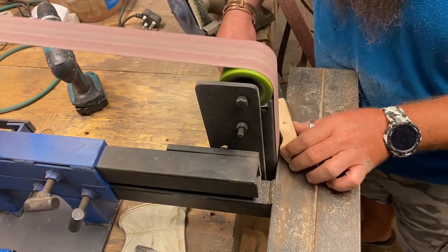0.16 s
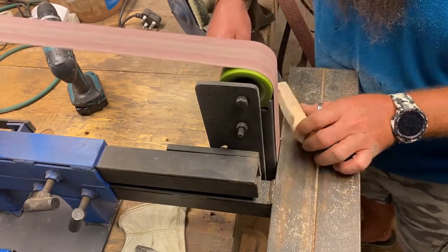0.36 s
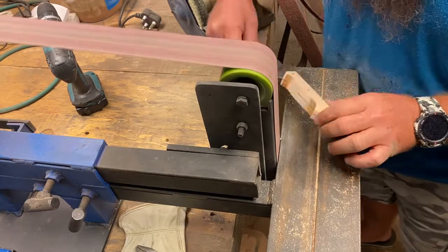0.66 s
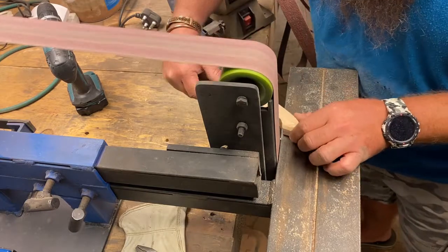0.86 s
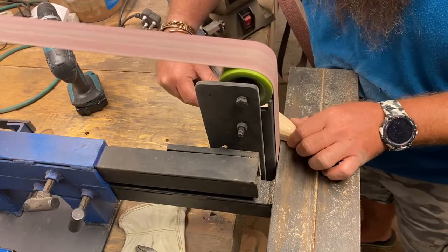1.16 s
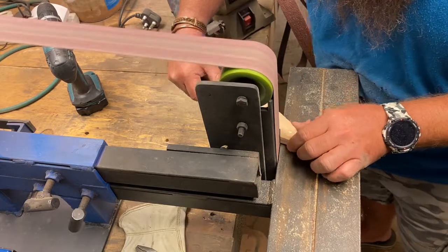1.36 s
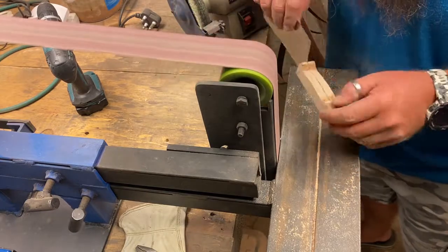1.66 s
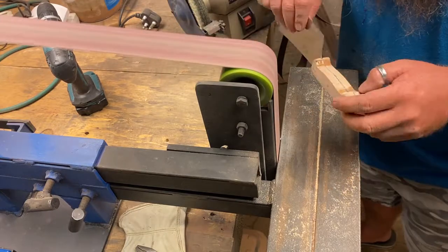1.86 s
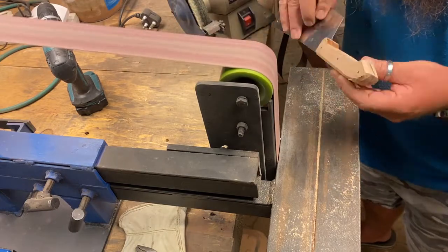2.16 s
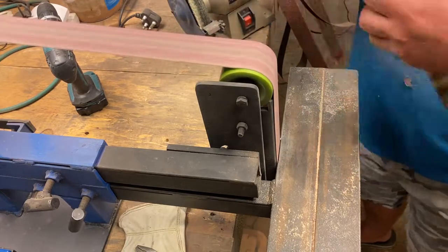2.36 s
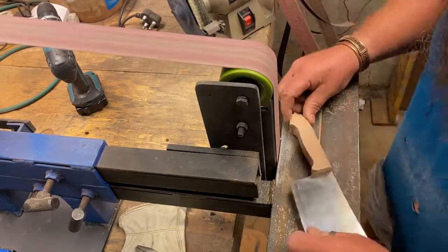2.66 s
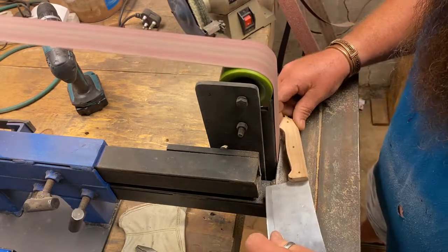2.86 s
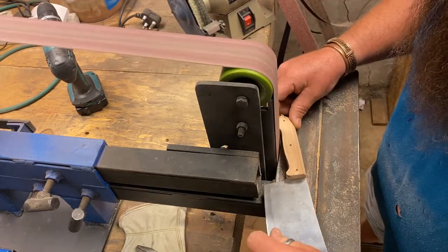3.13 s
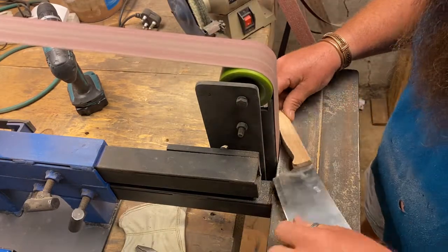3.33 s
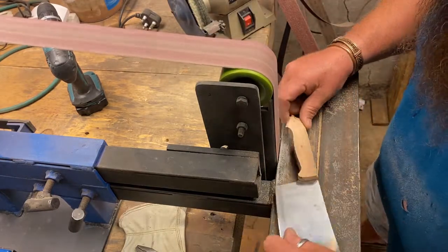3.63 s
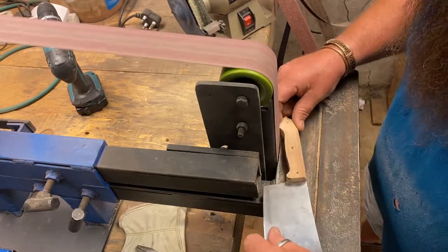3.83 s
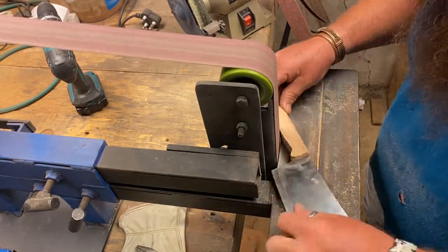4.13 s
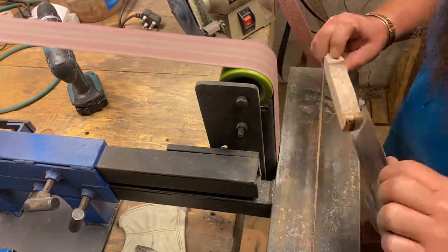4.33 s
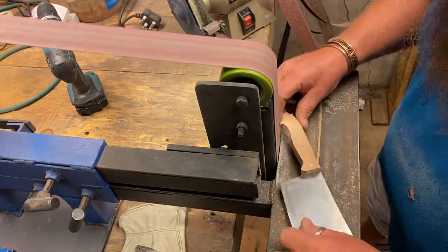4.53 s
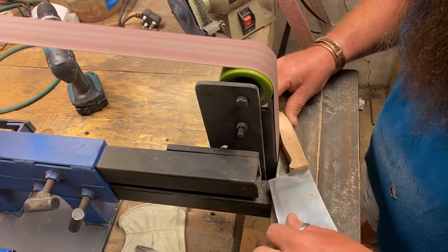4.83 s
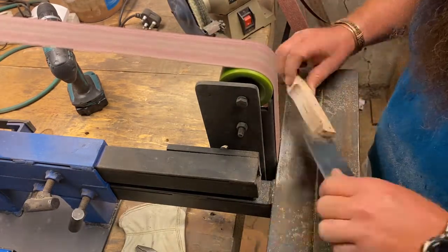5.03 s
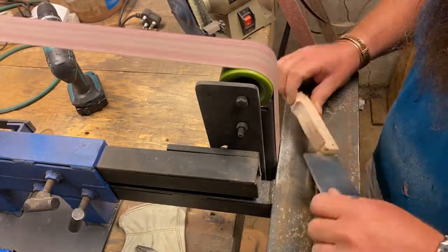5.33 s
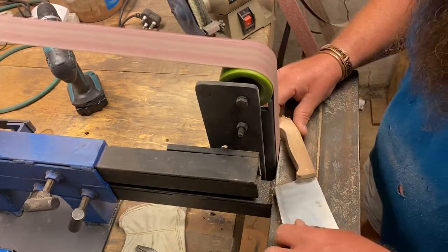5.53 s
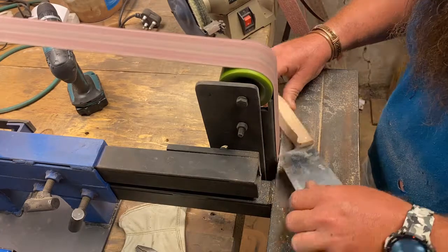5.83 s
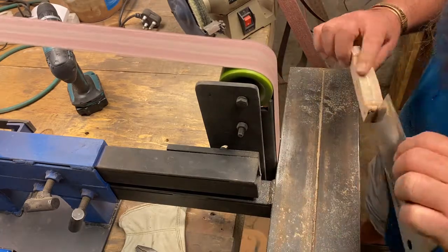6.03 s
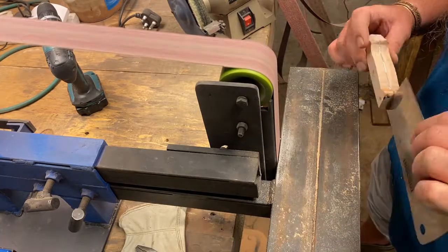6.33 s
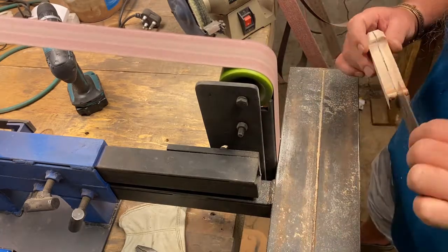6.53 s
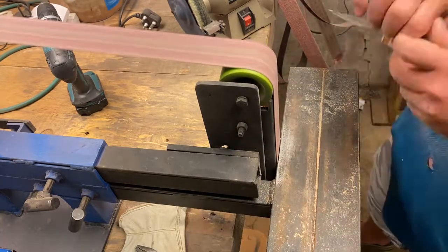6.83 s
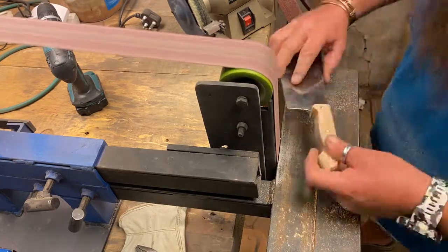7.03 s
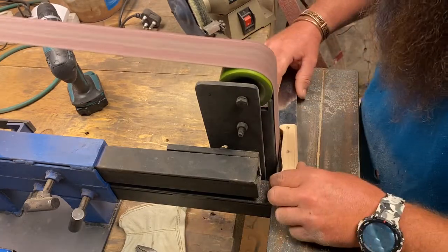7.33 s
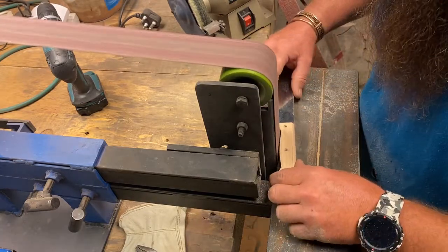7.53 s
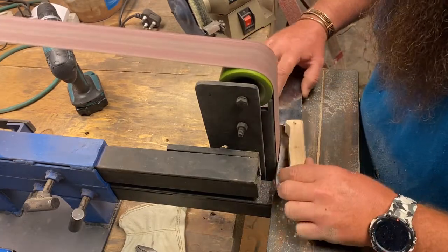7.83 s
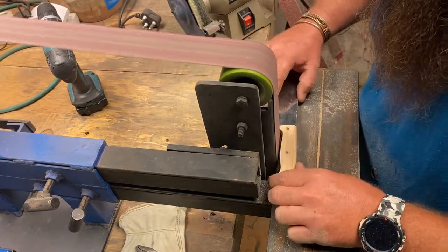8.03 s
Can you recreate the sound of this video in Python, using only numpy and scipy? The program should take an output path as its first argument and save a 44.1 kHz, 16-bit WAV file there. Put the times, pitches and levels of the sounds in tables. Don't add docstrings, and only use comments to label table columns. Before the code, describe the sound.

A running belt grinder fills the close stereo sound with a dense, rough drone, fluttering hum and windy belt noise. Wood is already sanding at the start, then touches lightly, presses harder several times in the middle, pauses, and returns near the end. Each contact is a crisp, high tearing hiss with a tiny pitch drop; the machine never stops.

```python
import sys
import numpy as np
from scipy import signal
from scipy.fft import rfft, irfft, next_fast_len
from scipy.io import wavfile
from scipy.ndimage import uniform_filter1d, map_coordinates

SR = 44100
rng = np.random.default_rng(int(sys.argv[2]) if len(sys.argv) > 2 else 0)


def linear_from_db(decibels):
    return 10 ** (np.asarray(decibels, float) / 20)


def to_wav(s):
    ch = np.atleast_2d(s).T
    pcm = np.round(np.clip(ch, -1, 1) * 32767)
    wavfile.write(sys.argv[1], SR, pcm.astype(np.int16))


N = 360738
DRIVE_HZ, FAN_HZ, GUIDE_HZ, MOTOR_HZ = 197.17, 199.485, 302.01, 299.98
RATTLE_HZ, CONTACT_WHEEL_HZ = 100.2, 32.75


def unit(x):
    return x / np.sqrt(np.mean(x ** 2) + 1e-20)


def along(points, hz):
    f, value = np.transpose(points)
    return np.interp(np.log(hz + 1), np.log(f + 1), value)


def curves(rows):
    s, *columns = np.transpose(rows)
    return [np.interp(np.arange(N) / SR, s, column) for column in columns]


def wobble(rate):
    knots = rng.standard_normal(int(N * rate / SR) + 4)
    smooth = map_coordinates(knots, [np.arange(0, N, 32) * rate / SR])
    return np.repeat(smooth, 32)[:N].astype(np.float32)


def repeating(turn_hz, likeness):
    def response(hz):
        kept = np.clip(likeness(hz), 0, .9)
        return 1 / (1 - kept * np.exp(-2j * np.pi * hz / turn_hz))
    return response


def rush(spectrum, source=None, comb=lambda hz: 1):
    # f/Hz, correlation/1
    ear_likeness = [(100, 0.79), (290, 0.91), (640, 0.83), (1400, 0.78), (3100, 0.15), (5000, 0.18),
                    (7000, 0.1), (10000, 0.66), (15000, 0.63)]
    pair = rng.standard_normal((2, N)) if source is None else source
    m = next_fast_len(N, True)
    hz = np.fft.rfftfreq(m, 1 / SR)
    turn = np.arccos(np.clip(along(ear_likeness, hz), -1, 1)) / 2
    coloured = rfft(pair, m) * linear_from_db(along(spectrum, hz)) * comb(hz)
    mid, side = irfft(coloured * [np.cos(turn), np.sin(turn)], m)[:, :N]
    return unit(np.array([mid + side, mid - side]))


def hum(orders, turns, base_hz, trim_db, lag=0., waver=0.25):
    out = np.zeros((2, N), np.float32)
    for k, db, pan_db, lead in orders:
        height = min(.07 + k * base_hz / 3000, 1.1)
        cycles = k * turns - lag * (k - 1)
        phase = (2 * np.pi * (cycles - np.floor(cycles))).astype(np.float32)
        phase = phase + height * 1.6 * waver * wobble(7)
        peak = np.float32(linear_from_db(db + trim_db) * np.sqrt(2))
        size = peak * np.abs(1 + height * waver * wobble(6))
        for channel, side in enumerate((1 / 2, -1 / 2)):
            out[channel] += size * float(linear_from_db(side * pan_db)) * np.cos(phase + side * lead)
    return out


def drag():
    # slowing from t/s, slowest t/s, free again t/s, peak load/%
    loads = [
        (-.04, .314, .4, .95),
        (1.17, 1.347, 1.449, .46),
        (3.055, 3.349, 3.471, .67),
        (3.858, 4.106, 4.26, 1.13),
        (4.712, 4.964, 5.039, 1.32),
        (5.612, 5.784, 5.928, 1.39),
        (7.433, 7.651, 7.7, .96),
        (8.06, 8.13, 8.2, .3),
    ]
    t = np.arange(N) / SR
    loss = np.zeros(N)
    for start, slowest, free, percent in loads:
        loss += percent * np.sin(np.interp(t, [start, slowest, free], [0, np.pi / 2, 0]))
    return np.pi / 4 * loss


def wheels(clock):
    # multiple/1, level/dB, left-right/dB, left lead/rad
    drive_orders = [(1, -34, 0, 0.0), (2, -26, 1, -0.0), (3, -35, 0, 0.0), (4, -54, 4, 0.2),
                    (5, -51, -1, 1.0), (6, -42, -3, 0.7), (7, -42, -3, 0.5), (8, -49, 4, -0.0),
                    (9, -49, -9, 0.8), (10, -51, 0, 1.5), (11, -53, 1, 0.5), (12, -54, -3, 0.6)]
    fan_orders = [(2, -38, 0, -0.1), (4, -46, -6, -0.3), (6, -44, 3, 0.4), (10, -52, 5, 1.0)]
    guide_orders = [(3, -41, 2, -0.2), (4, -41.5, 4, 0.4), (5, -48, 1, -0.3), (6, -54, -4, -0.7)]
    # f/Hz, level/dB, left-right/dB, left lead/rad
    bearing_tones = [(497, -57, 0, 0), (596, -50, 0, 0), (636, -53, 0, -.3), (709, -58, -1, .3),
                     (995, -55, 0, .3), (1102.8, -46, -5, .8), (1287.5, -50, 0, .5), (1609.8, -50, 2, .2),
                     (1204.7, -50, 0, .4), (1807, -49, -2, 0), (2402, -49.5, 1, .3), (2655, -50, 3, .1),
                     (2955, -57, 2, .5), (3154, -56, 0, .5), (4800, -56, -2, .5), (2793, -53, 7, 1.7),
                     (3352, -54, 9, .6), (4397, -54, -1, 1.2)]
    drive = DRIVE_HZ * clock + .25
    fan = FAN_HZ * np.arange(N) / SR + .175
    thumps = hum(drive_orders, drive, DRIVE_HZ, 0., lag=1 / 4)
    thumps += hum(fan_orders, fan, DRIVE_HZ, -1.2, lag=1 / 4, waver=0.24)
    shoulder = hum([(2, -52, 0, .2)], 2 * fan - drive + 1 / 4, DRIVE_HZ, .1, lag=1 / 4)
    guide = hum(guide_orders, GUIDE_HZ * clock, GUIDE_HZ, 0.09)
    return thumps + shoulder + guide + hum(bearing_tones, clock, 1, -0.077)


def rattle(clock):
    # f/Hz, density/dB
    frame_colour = [(150, -19.5), (250, -13), (500, -8.5), (740, -7.5), (1000, -1.5), (1200, -3),
                    (1800, -5), (2500, -7.5), (3300, -20.5), (5000, -63)]
    comb = repeating(RATTLE_HZ, lambda hz: (.62 - hz / 14000) * (hz > 750))
    steady = rush(frame_colour, comb=comb)
    dragged = np.array([np.interp(clock * SR, np.arange(N), channel) for channel in steady])
    return linear_from_db(-32 + 0.46 * wobble(4.5) + 0.57 * wobble(14)) * dragged


def belt_rush(near):
    # f/Hz, density/dB
    belt_colour = [(700, -40), (1500, -0.5), (3000, 0.5), (4500, -0.5), (5700, 1), (5950, -4.5),
                   (7300, -7.5), (9000, -9.5)]
    fizz_colour = [(5000, -53), (7400, -1), (8500, 1.5), (10200, 1.5), (11000, 6), (12000, -0.5),
                   (14000, 4), (16000, -2)]
    motor_comb = repeating(MOTOR_HZ, lambda hz: .22)
    contact_comb = repeating(CONTACT_WHEEL_HZ, lambda hz: .25)
    air = near * linear_from_db(2.0 + 0.2 * wobble(7)) * rush(belt_colour, comb=repeating(RATTLE_HZ, lambda hz: .25))
    return air + linear_from_db(-34.0) * rush(fizz_colour, comb=lambda hz: motor_comb(hz) * contact_comb(hz))


def motor(clock):
    # multiple/1, level/dB, left-right/dB, left lead/rad
    motor_orders = [(2, -51, 4, 0.1), (3, -50, 2, -0.3), (5, -50, 2, 0.8), (6, -49, -10, -3.1),
                    (7, -53, -7, 2.9), (8, -50, 1, 0.3), (9, -50, 1, 0.6), (10, -53, 9, 0.7),
                    (11, -51, 2, 1.5), (12, -44, 2, -0.4), (13, -46, 1, -1.9), (14, -45, -9, -0.7),
                    (15, -40, 1, -1.3), (16, -53, 6, 2.4), (18, -53, 11, 0.9), (19, -57, 0, 0.1),
                    (23, -57, -2, -0.9), (26, -57, 4, -0.2), (31, -59, 5, 1.9), (35, -56, 4, 0.3),
                    (36, -51, 0, 0.0), (42, -57, 0, 0.6), (44, -58, 2, 0.1), (45, -58, 0, 0.1),
                    (46, -56, 2, 0.0), (47, -59, 1, -0.0), (49, -52, 4, 0.4), (50, -52, 3, 0.3),
                    (52, -59, 3, 0.2)]
    # f/Hz, level/dB, turns at the start/1
    throb_tones = [
        (MOTOR_HZ, -51, .04),
        (301.16, -48.9, -.28),
        (GUIDE_HZ, -49.5, .02),
    ]
    # t/s, level/dB
    distance = [
        (0, -33),
        (2.6, -33),
        (3.3, -33),
        (5.2, -33.5),
        (8.18, -33),
    ]
    # t/s, order 12/dB, order 14/dB, order 15/dB
    whine_levels = [
        (0, -44, -46, -38),
        (1.2, -44.5, -50, -43),
        (2.2, -41.5, -53, -38.5),
        (2.6, -43, -48, -40.5),
        (2.7, -50, -45, -41.5),
        (5.9, -48.5, -48.5, -41.5),
        (6.1, -46, -51, -44),
        (7.1, -46, -52, -43.5),
        (7.35, -52, -48, -46),
        (8.18, -56, -51, -43),
    ]
    shade_db = (2, 14, 1)
    turns, near = MOTOR_HZ * clock, linear_from_db(curves(distance)[0])
    air = belt_rush(near)
    throb = sum(linear_from_db(db) * np.sqrt(2) * np.cos(2 * np.pi * (hz * clock + start)) for hz, db, start in throb_tones)

    strong = dict(zip((12, 14, 15), curves(whine_levels) - np.outer(shade_db, drag())))
    strong[13] = strong[12] - 5.5
    slots = [(k, strong[k], *ear) for k, _, *ear in motor_orders if k in strong]
    loud = hum(slots, turns, MOTOR_HZ, 2.1, waver=0.088)

    listed = [(k, db + 2.5 * (k > 20), *ear) for k, db, *ear in motor_orders if k not in strong]
    named = [row[0] for row in motor_orders]
    faint = [(k, -61, 0, 0) for k in range(24, 42) if k not in named]
    weak = near * hum(listed + faint, turns, MOTOR_HZ, 31.9, waver=0.16)
    return loud + weak + air * linear_from_db(0.17 * np.cos(2 * np.pi * turns)) + throb


def sanding():
    # touch t/s, lift t/s, wood hiss level/dB, grit hiss level/dB
    strokes = [
        (0, 0.398, -40, -42),
        (1.19, 1.4, -39.5, -43),
        (3.13, 3.417, -36.5, -43),
        (3.91, 4.19, -36, -39),
        (4.724, 5.045, -39, -41),
        (5.602, 5.87, -36.5, -38),
        (7.38, 7.68, -38.5, -39),
        (8.06, 8.2, -37, -39),
    ]
    # t/s, wood hiss level/dB, grit hiss level/dB
    bites = [
        (.15, -31.5, -29),
        (.38, -44, -38),
        (3.16, -35, -38),
        (4.16, -39, -44),
        (4.81, -36, -32),
        (5.685, -33, -35),
        (7.37, -39, -36),
        (7.47, -53, -37),
        (7.654, -30.5, -37),
        (8.12, -40, -40),
    ]
    # f/Hz, density/dB
    wood_colour = [(3000, -24), (6500, -9), (8000, -2), (9800, 5.5), (11500, 0), (14000, -14)]
    grit_colour = [(8000, -39), (11000, -9), (13000, 6), (15000, 8), (16000, -11)]
    touch_s, lift_s, dig_db_per_s, slip_db_per_s = 0.051, 0.03, 153, 350
    t = np.arange(N) / SR
    held, dug = np.zeros((2, N)), np.zeros((2, N))
    for touch, lift, *db in strokes:
        press = np.interp(t, [touch - touch_s, touch, lift, lift + lift_s], [0, 1, 1, 0])
        held += linear_from_db(db)[:, None] * press
    for s, *db in bites:
        dug += linear_from_db(db)[:, None] * linear_from_db(np.minimum(dig_db_per_s * (t - s), slip_db_per_s * (s - t)))
    wood_gain, grit_gain = np.hypot(held, dug)
    wood = wood_gain * linear_from_db(1.2 + 1.5 * wobble(40) + .7 * wobble(12)) * rush(wood_colour)
    grit = grit_gain * linear_from_db(-1. + 1.6 * wobble(40) + .8 * wobble(12)) * rush(grit_colour)
    return wood + grit


def low_ticks():
    # f/Hz, density/dB
    thud_colour = [(15, 4), (40, -8), (100, -1), (170, -2.5), (400, -23)]
    ticks = 0.019 * rng.standard_normal((2, N))
    at = (np.arange(0, N / SR, 1 / 30) + rng.uniform(0, .012, 246)) * SR
    ticks[:, at.astype(int)] += rng.standard_normal((2, len(at)))
    return linear_from_db(-54.5) * rush(thud_colour, source=ticks)


def scene():
    clock = np.cumsum(1 - drag() / 100) / SR + 1.5e-5 * wobble(5)
    return wheels(clock) + rattle(clock) + motor(clock) + sanding() + low_ticks()


def gain_control():
    # t/s, depth/dB, fall/s, easing to under half the depth/s
    ducks = [
        (4.812, -3.5, 0.014, 0.2),
        (5.678, -4.5, .018, 0.19),
    ]
    t = np.arange(N) / SR
    duck_db = np.zeros(N)
    for s, db, fall, ease in ducks:
        at = [s, s + fall, s + 0.49 * ease, s + ease, s + ease + 0.12]
        duck_db += np.interp(t, at, [0, db, 0.73 * db, 0.44 * db, 0])
    return duck_db


def patches(x, depth_db, over_hz):
    top_hz, band_bins = 15760, 14
    hz, t, z = signal.stft(x, SR, nperseg=1024)
    bands = uniform_filter1d(rng.standard_normal((len(hz) // band_bins + 1, len(t))), size=3, axis=1)
    treble = uniform_filter1d(np.abs(z[0, hz > over_hz]).mean(axis=0), size=9)
    faint = np.clip(np.median(treble) / treble, 0, 1.2) ** 4
    thinned_db = -depth_db * faint * np.clip(unit(bands) - .3, 0, None) ** 2
    thinned_db = np.repeat(thinned_db, band_bins, axis=0)[:len(hz)]
    gain = linear_from_db(thinned_db * (hz[:, None] > over_hz))
    return signal.istft(z * gain * (hz[:, None] < top_hz), SR, nperseg=1024)[1][:, :N]


def top_cut(x):
    return signal.sosfilt(signal.butter(12, 15960, fs=SR, output="sos"), x)


def record(dry):
    ducked = dry * linear_from_db(gain_control() + [[.1], [-.1]])
    camera = patches(ducked, depth_db=11, over_hz=7500)
    return top_cut(camera)


dry = scene()
out = record(dry)
to_wav(out)
```